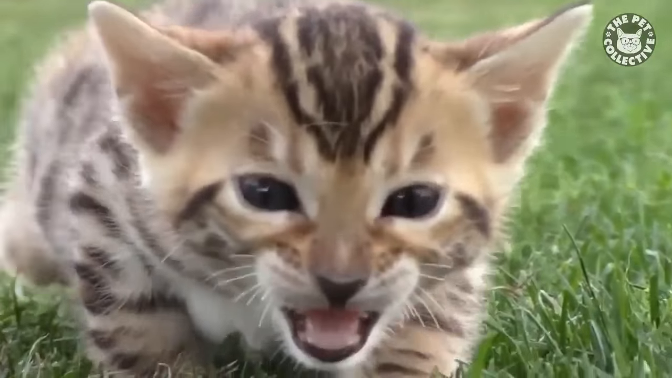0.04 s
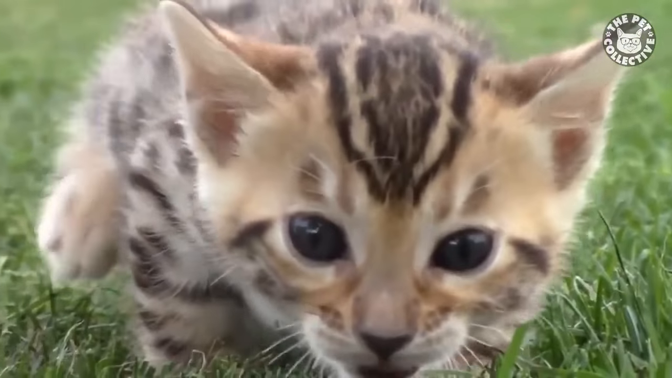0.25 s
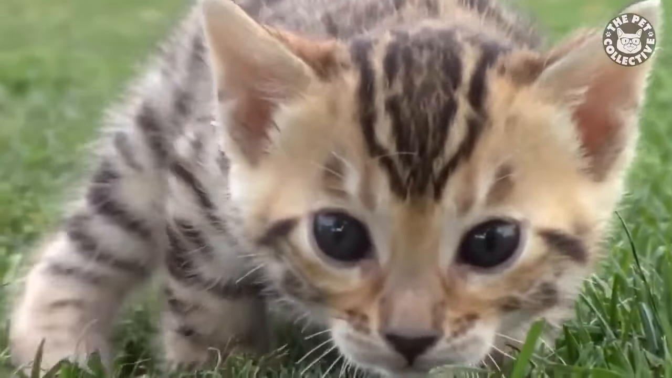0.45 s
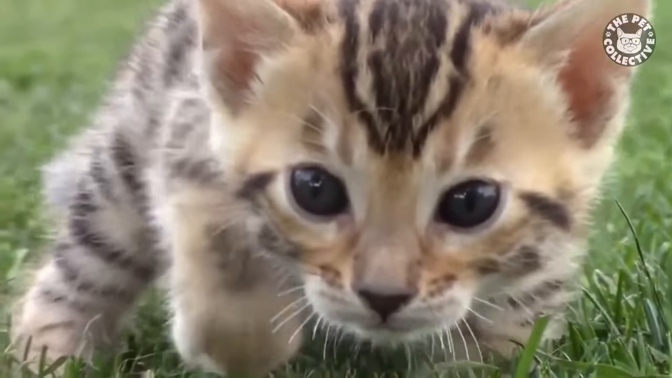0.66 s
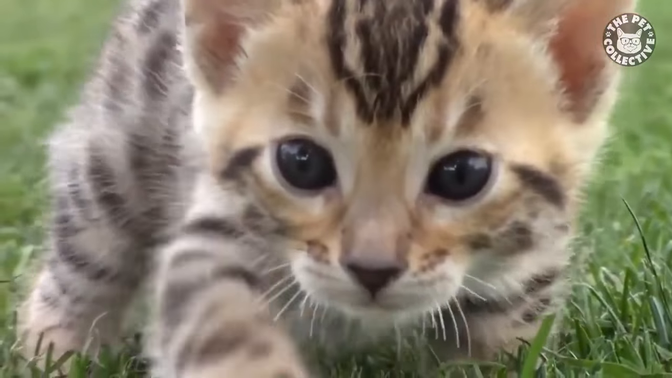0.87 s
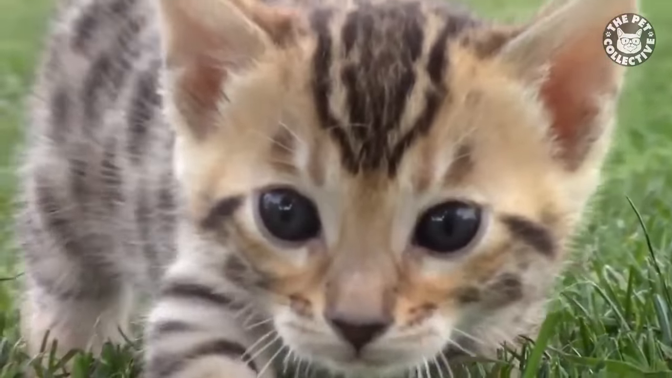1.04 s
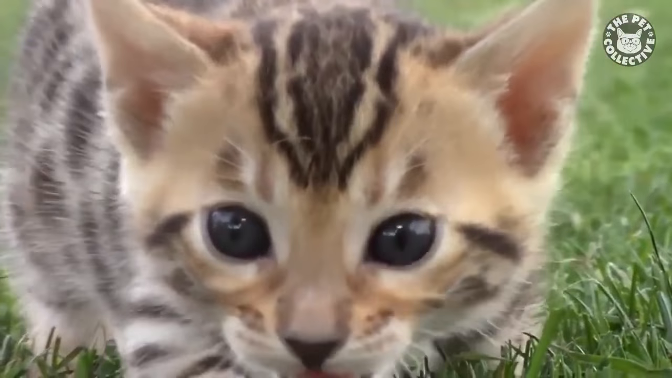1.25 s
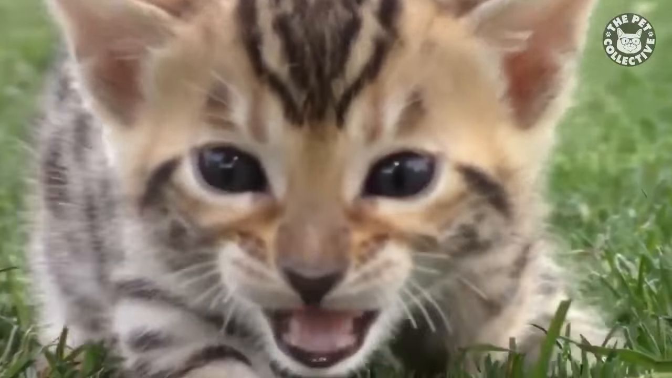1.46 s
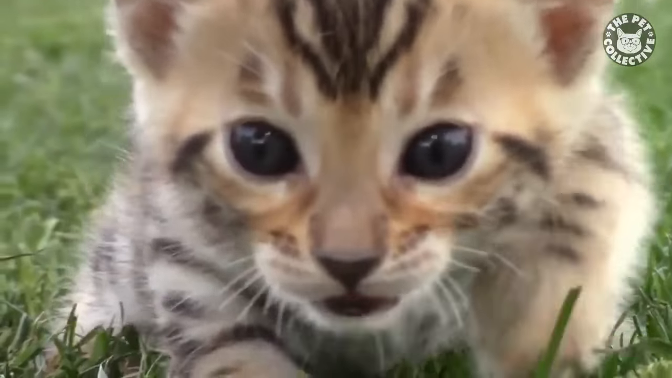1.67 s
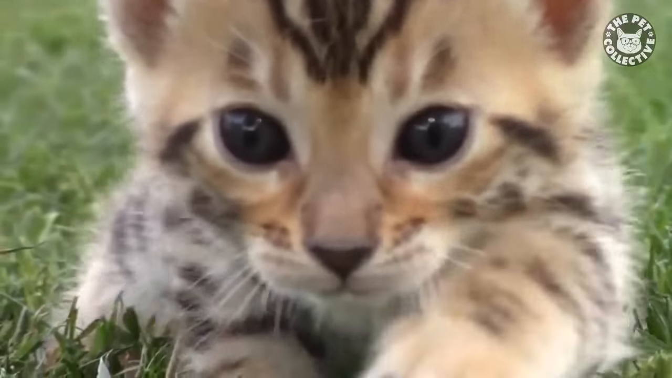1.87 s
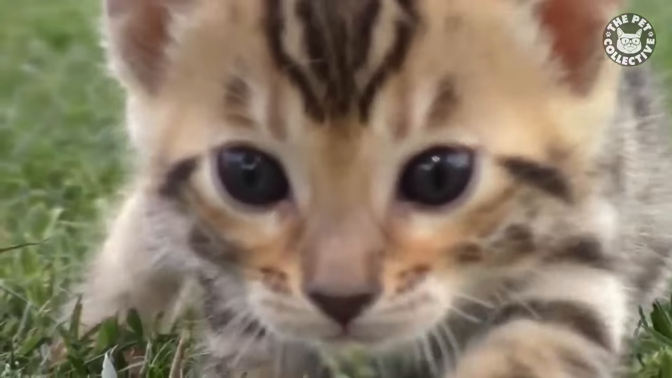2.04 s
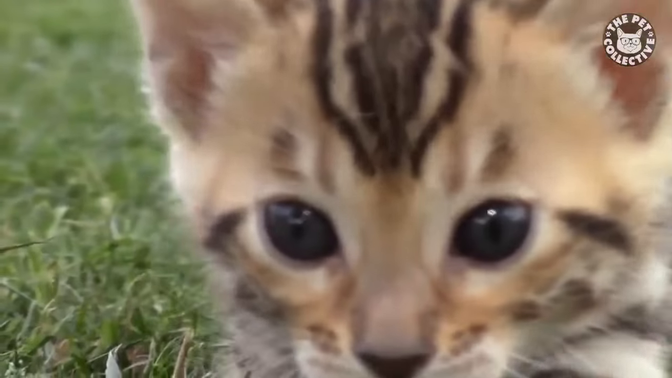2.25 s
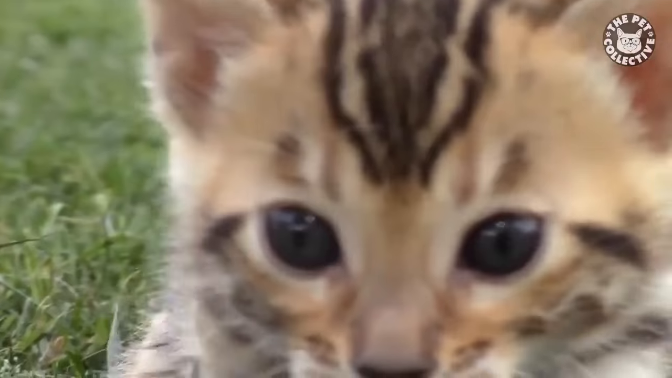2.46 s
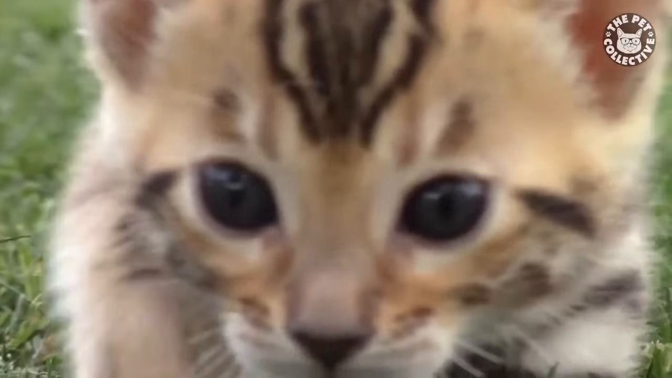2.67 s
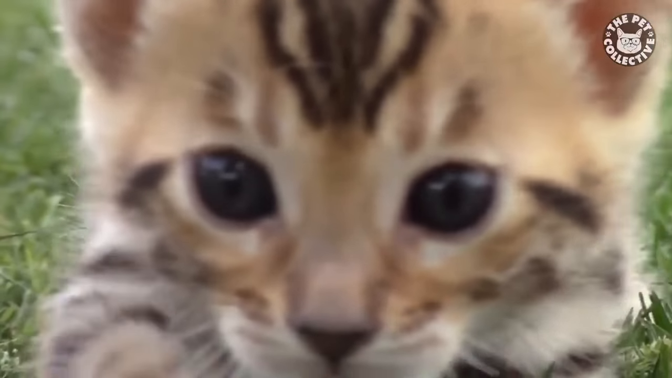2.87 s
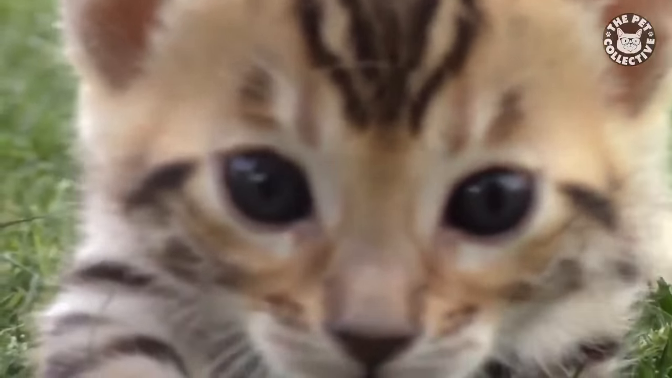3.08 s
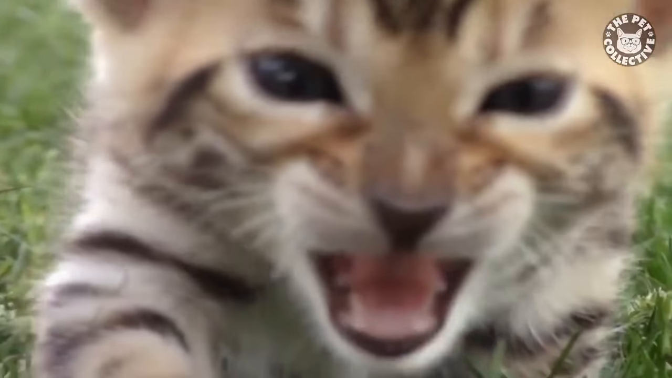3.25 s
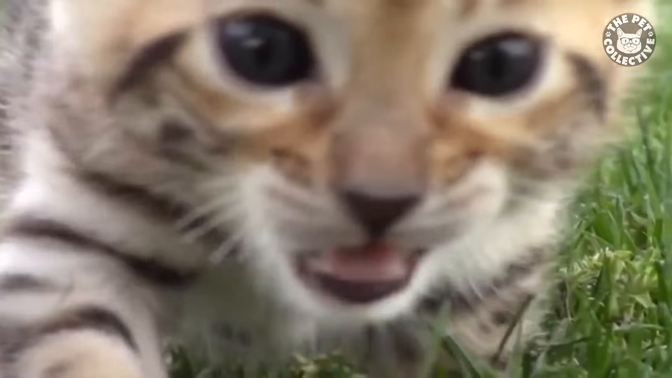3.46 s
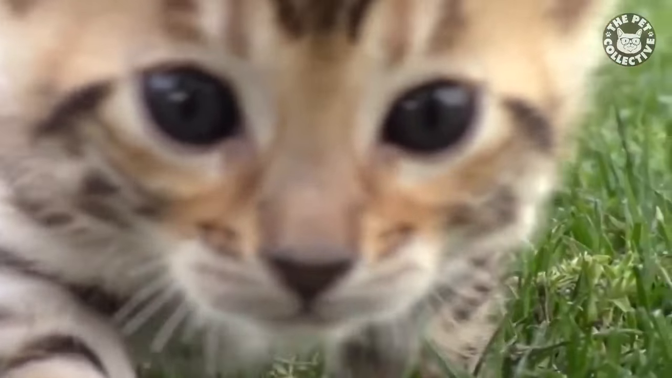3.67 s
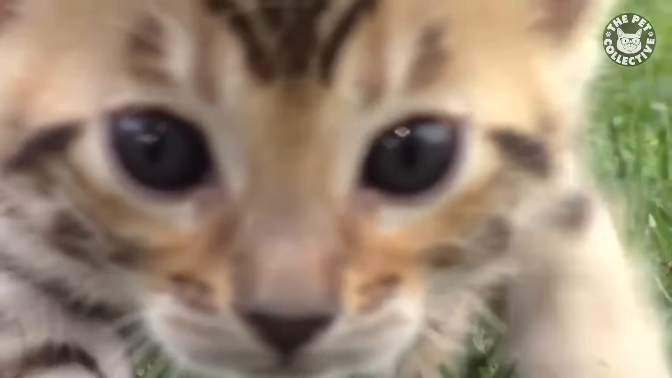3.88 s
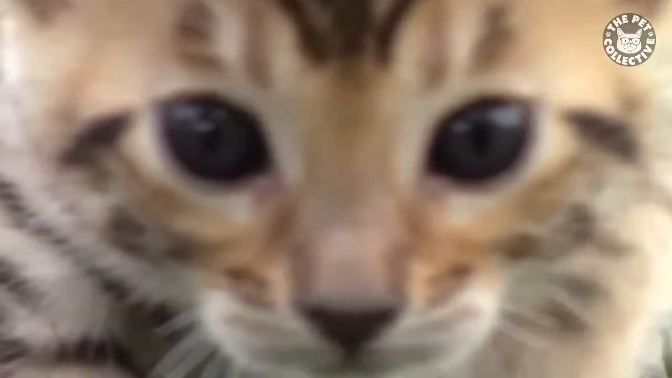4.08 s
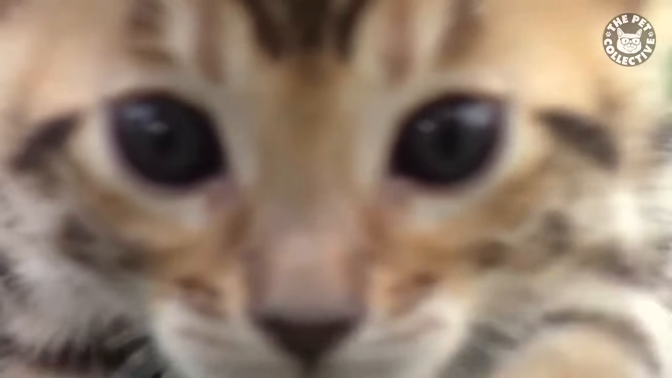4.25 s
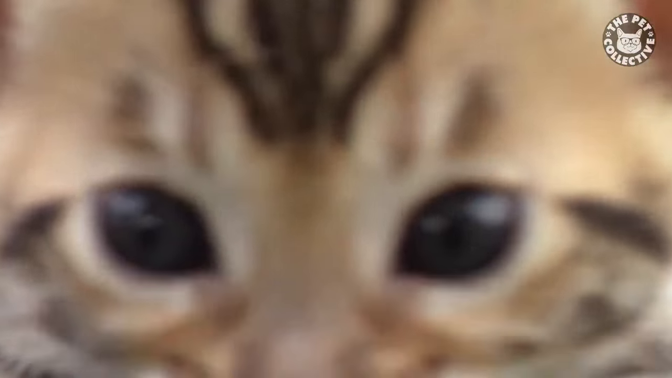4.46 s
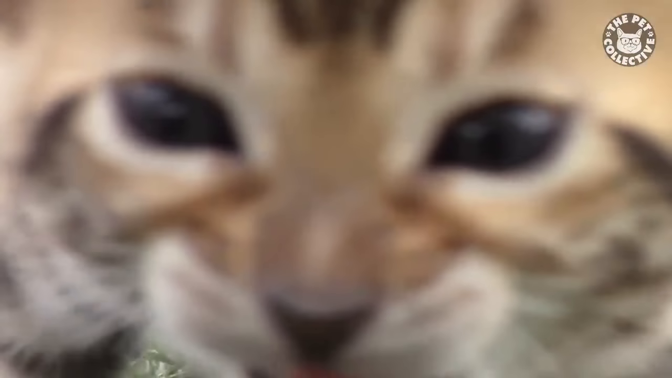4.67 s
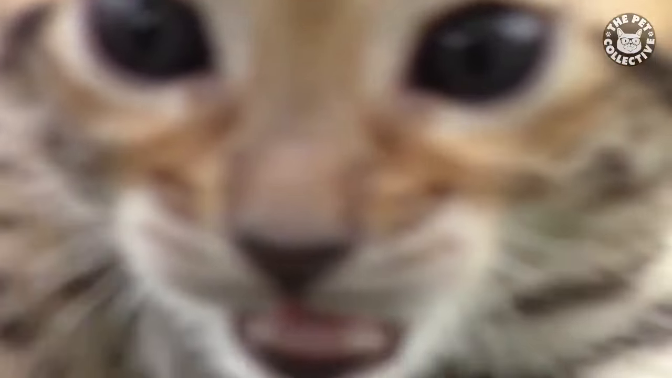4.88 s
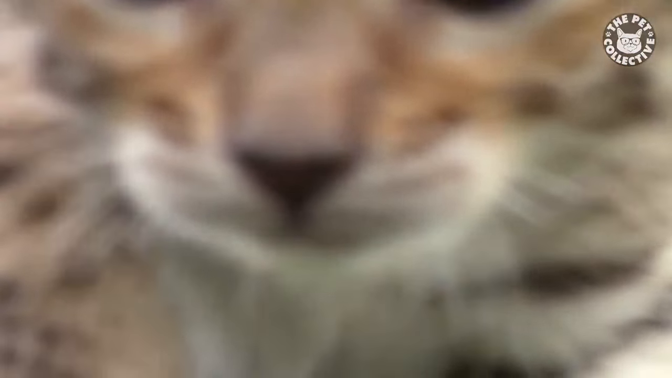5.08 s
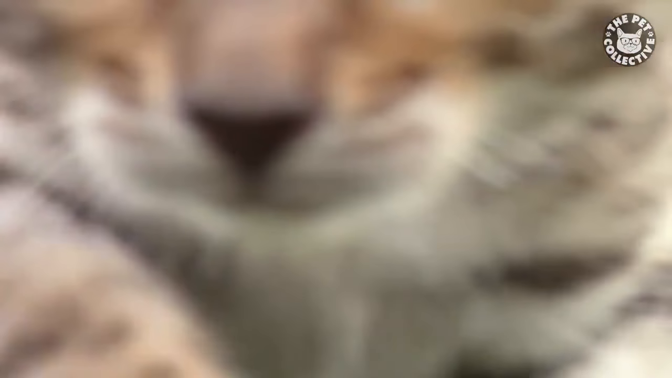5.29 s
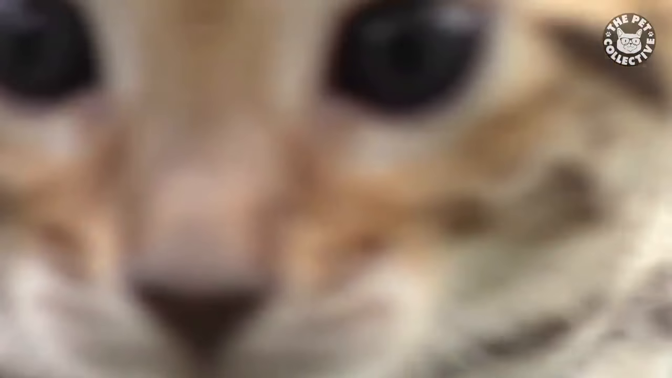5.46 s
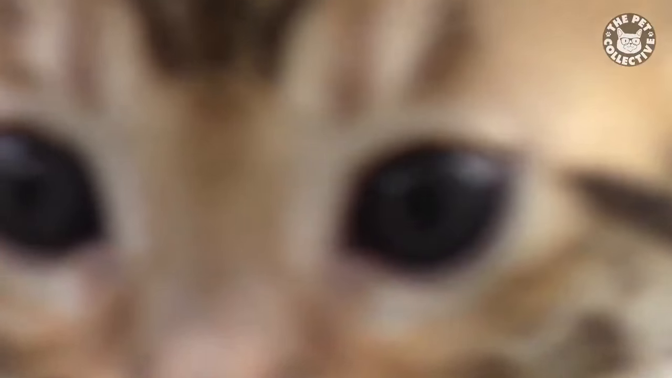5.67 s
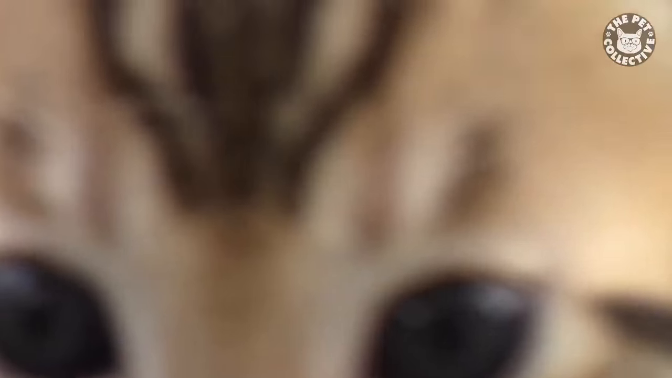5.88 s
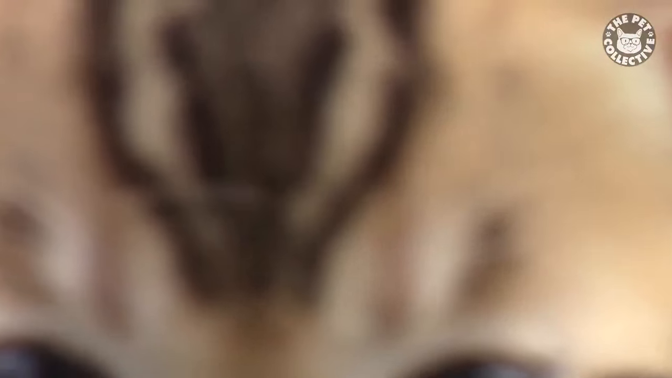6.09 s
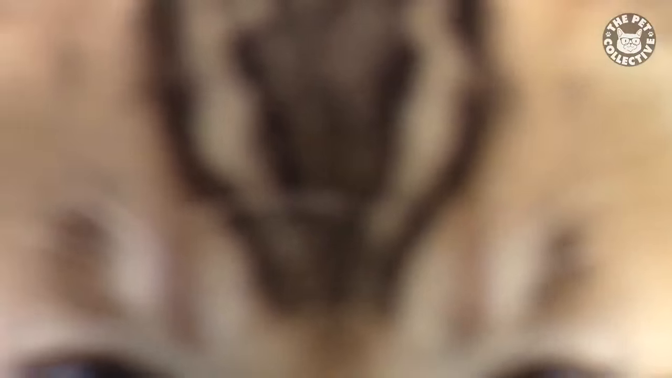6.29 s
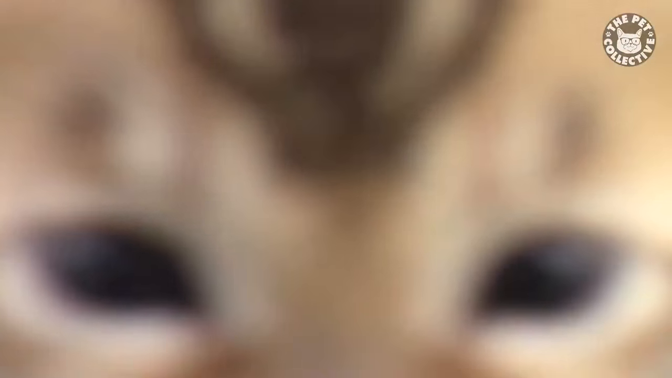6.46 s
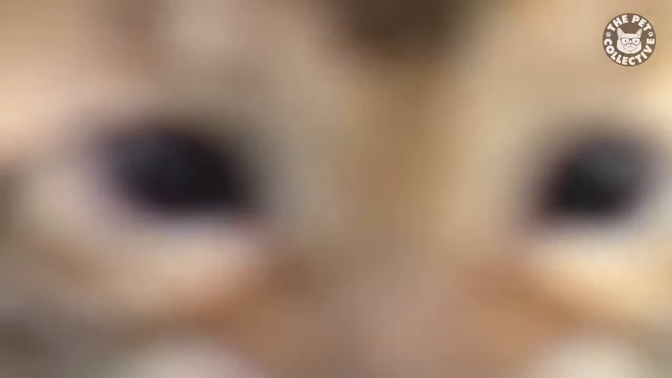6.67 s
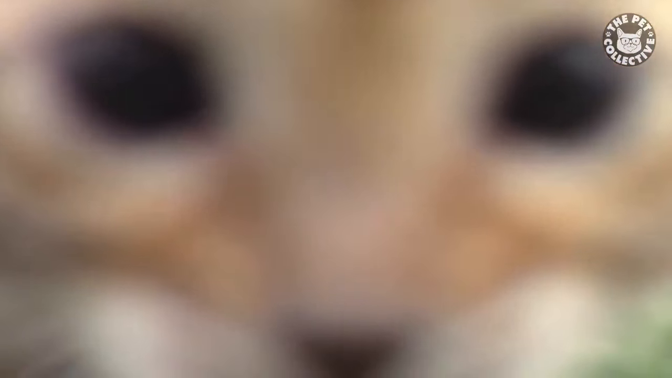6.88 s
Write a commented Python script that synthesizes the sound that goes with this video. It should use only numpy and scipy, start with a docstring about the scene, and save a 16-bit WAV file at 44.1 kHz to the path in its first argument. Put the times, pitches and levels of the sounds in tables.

```python
"""A kitten on a lawn, close to the microphone, meows five times and squeaks once; the first meow is under way at once.
Source and filter: vocal-fold harmonics and pulsed turbulence excite one moving mouth resonance. Each meow starts
raspy and wide open; the closing jaw sweeps the resonance down over the second harmonic, then the fundamental,
and the pitch breaks downward. Small noise bursts tick nearby. Gliding sine tones make the far birds and a motor;
shaped noise makes the rumble and soft hiss."""
import sys
import numpy as np
from scipy import signal
from scipy.fft import rfft, irfft
from scipy.io import wavfile
from scipy.ndimage import uniform_filter1d, minimum_filter1d

SR = 44100
rng = np.random.default_rng(int(sys.argv[2]) if len(sys.argv) > 2 else 0)


def wav_out(sig):
    """Save sig, one row per channel (or a flat mono array), as 16-bit PCM at SR to the path in sys.argv[1]."""
    wavfile.write(sys.argv[1], SR, np.round(np.clip(np.atleast_2d(sig).T, -1, 1) * 32767).astype(np.int16))


N = 305613
TIME = np.arange(N) / SR
CUTOFF_HZ = 15700
# Landmarks of a meow: start, crack (the mouth resonance crosses the second harmonic),
# crest (it comes down to the fundamental), break (the pitch gives way) and end.
ATTACK_S, HALF_SHUT_S = .02, .056  # after the start; after the crack
TUG_TURN_S = .0027  # time scale of the pitch reversal at the crack
BREAK_HZ, JUMP_S = 1270, .008  # pitch at the break, length of the sudden drop
SHUT_HZ = 1010  # resonance towards which the closing mouth settles


def meow(row, bands_hz, fade_s=.006, rasp_gain_db=2.0, puff=.78):
    """Source-filter principle: harmonic voice and pulsed turbulence share one moving mouth resonance."""
    # a second vibration of the folds beats against the pitch, swelling and fading around a moment: centre_s,
    # length_s, rate_hz, depth_db
    flutters = [(3.55, .055, 570, -31), (3.705, .022, 400, -11), (5.18, .02, 360, -11)]
    marks, pitches, levels = row[:5], row[5:12], row[12:17]
    rasps, slopes, screech_hz = row[17:20], row[20:22], row[22]
    opened = gate([[s] for s in marks], TIME, fade_s)
    active = opened > 0
    t = TIME[active]
    pitch = pitch_course(t, marks, *pitches)
    mouth = mouth_course(t, marks, pitch, screech_hz)
    level_db = level_course(t, marks, pitch, *levels)
    slope = slope_course(t, marks, *slopes)
    noise_db = rasp_course(t, marks, *rasps)

    # the folds are unsteady when the call is breathy or the pitch is slack
    breathiness = from_db(noise_db - level_db)
    slackness = np.clip(1 - pitch / 1200, 0, 1)
    rough = np.clip(breathiness + .8 * slackness, 0, .35)

    voice = from_db(level_db) * voiced(pitch, mouth, slope, rough, bands_hz)
    for s, length, rate_hz, depth_db in flutters:
        window = np.exp(-(2 * (t - s) / length) ** 2)
        voice = voice * (1 + from_db(depth_db) * window * np.sin(2 * np.pi * rate_hz * t))

    # the air escapes in puffs, one per cycle of the folds
    puffs = 1 + puff * np.cos(phase_of(pitch))
    air = rms_one(rng.standard_normal(len(t)) * puffs)
    turbulence = from_db(noise_db + rasp_gain_db) * rasp(air, mouth, rough, bands_hz)
    out = np.zeros(N)
    out[active] = voice + turbulence
    return out * opened


def pitch_course(t, marks, held_hz, overshoot_hz, crest_hz, bow, jump_hz, slide_s, bottom_hz):
    """Fold tension sets the pitch: scoop, hold, lift to the crest, sag as the effort runs out, break downward."""
    start_hz, scoop_s, scoop_ease = 712.4, .07, 1.6
    overshoot_at_s, overshoot_width_s = .083, .02
    tug_hz, tug_s, crest_ease = 38.7, .011, 1.2
    last_sag_hz_per_s = 1100
    start, crack, crest, snap, _ = marks
    scoop_left = (1 - progress(t, start, start + scoop_s)) ** scoop_ease
    hz = held_hz - (held_hz - start_hz) * scoop_left
    hz = hz + overshoot_hz * bell(t, start + overshoot_at_s, overshoot_width_s)
    # the pitch is tugged down just before the crack and up just after it
    hz = hz + tug_hz * np.tanh((t - crack) / TUG_TURN_S) * np.exp(-np.abs(t - crack) / tug_s)
    lift = np.sin(np.pi / 2 * progress(t, crack, crest) ** crest_ease) ** 2
    hz = hz + (crest_hz - held_hz) * lift
    sag = progress(t, crest, snap)
    hz = hz - (crest_hz - BREAK_HZ) * sag * (1 + bow * (1 - sag))
    hz = hz - jump_hz * progress(t, snap, snap + JUMP_S)
    hz = hz - (BREAK_HZ - jump_hz - bottom_hz) * progress(t, snap, snap + slide_s)
    return hz - last_sag_hz_per_s * np.maximum(t - snap - slide_s, 0)


def mouth_course(t, marks, pitch, screech_hz):
    """Jaw opening tunes the mouth: its resonance peaks in the scoop, sinks past two harmonics, then settles."""
    open_hz, screech_at_s, screech_width_s = 3292, .054, .026
    jaw_lead_s, jaw_ease, jaw_settle_s = .055, 1.4, .089
    start, crack, crest, _, _ = marks
    at_crack = 2 * np.interp(crack - TUG_TURN_S, t, pitch)
    at_crest = 1.08 * np.interp(crest, t, pitch)  # just above the fundamental
    hz = open_hz + (screech_hz - open_hz) * bell(t, start + screech_at_s, screech_width_s)
    hz = hz + (at_crack - open_hz) * progress(t, crack - jaw_lead_s, crack)
    hz = hz + (at_crest - at_crack) * progress(t, crack, crest) ** jaw_ease
    settled = 1 - np.exp(-np.maximum(t - crest, 0) / jaw_settle_s)
    return hz + (SHUT_HZ - at_crest) * settled


def level_course(t, marks, pitch, onset_db, crack_db, crest_db, break_db, end_db):
    """Resonant reinforcement: swells at crack, crest and break ride on one arch of effort in dB."""
    start_db = -38.5
    crest_swell_db, crest_lag_s, crest_width_s = 3.5, .017, .026
    break_swell_db, break_width_hz = 7, 180
    start, crack, crest, snap, end = marks
    effort = np.interp(t, [start, start + ATTACK_S, crest, snap, end],
                       [start_db, onset_db, crest_db, break_db, end_db])
    crack_swell = crack_db * lock(t, crack)
    crest_swell = crest_swell_db * bell(t, crest + crest_lag_s, crest_width_s)
    break_swell = break_swell_db * progress(t, snap, snap + JUMP_S) * hump(pitch, SHUT_HZ, break_width_hz)
    return effort + crack_swell + crest_swell + break_swell


def slope_course(t, marks, open_db, shut_db):
    """Spectral tilt in dB per octave: sharper fold closure as the call clears makes brighter overtones."""
    crack_slope, dull_slope, slack_slope = 4, -3.5, -13  # extra at the crack, loss after it, value at the end
    _, crack, crest, snap, end = marks
    slope = np.interp(t, [crack, crack + HALF_SHUT_S, crest, snap, end],
                      [open_db, open_db + dull_slope, shut_db, shut_db, slack_slope])
    return slope + crack_slope * lock(t, crack)


def rasp_course(t, marks, onset_db, half_shut_db, shut_db):
    """Course of the turbulence in dB, before a common gain: it changes with the mouth and is faint by the end."""
    start_db, end_db, fade_s = -57, -62, .035
    start, crack, crest, _, end = marks
    return np.interp(t, [start, start + ATTACK_S, crack + HALF_SHUT_S, crest + fade_s, end],
                     [start_db, onset_db, half_shut_db, shut_db, end_db])


def lock(t, crack):
    """Coupling of second harmonic and mouth resonance: builds up, then lets go at the crack."""
    build_s, drop_s = .039, .0066
    return np.where(t < crack, np.exp(-np.abs(t - crack) / build_s), bell(t, crack, drop_s))


def voiced(pitch, mouth, slope, rough, bands_hz, shimmer=.33, count=16):
    """Additive harmonics filtered by throat and mouth; rough folds wobble a near unit-power tone."""
    # fixed colour of the throat: frequency_hz, gain_db
    throat = [(700, 3.3), (1500, 1.8), (3000, 2), (3700, -6), (4500, 8), (6300, 5), (7500, 8), (9000, 2),
              (11000, -3), (12500, 2), (15000, 6)]
    mouth_q, upper_width_hz = 12, 500
    size = len(pitch)
    pitch = pitch * (1 + (.0022 + .028 * rough) * drift(60, size))
    k = np.arange(1, count + 1)[:, None]
    hz = k * pitch
    gain = from_db(slope * np.log2(k)) * at_hz(throat, hz) * bounce(hz, bands_hz) * (hz < CUTOFF_HZ)
    gain = gain * resonance(hz, mouth, mouth / mouth_q)
    gain = gain * resonance(hz, upper_of(mouth), upper_width_hz)

    # strained folds slap shut: a hard edge on the voice, heard while the mouth is wide open
    strain = np.minimum(rough / .15, 1)
    wide_open = np.clip(mouth / 1000 - 2.4, 0, 1)
    gain = gain * from_db(13 * strain * wide_open * hump(hz, 7000, 1700))

    # the overtones above the second harmonic swell, fade and flicker
    flicker_db = np.array([3 * drift(20, size) + .8 * drift(200, size) for _ in k])
    gain = gain * from_db((k > 2) * flicker_db)
    wave = (gain * np.sin(k * phase_of(pitch))).sum(axis=0)
    wave = wave / np.sqrt((gain ** 2).sum(axis=0) / 2)
    return wave * (1 + shimmer * rough * drift(350, size))


def rasp(air, mouth, rough, bands_hz, rough_rush=2.9, steady_rush=.089, sag=.94, width_hz=150,
         upper_db=-12, upper_width_hz=450, narrow_hz=2300, size=256):
    """Turbulence rings both mouth resonances, a little flat; rough folds let a broad rush out too."""
    # air rushing through the open mouth: frequency_hz, gain_db before the leak factor
    rush = [(700, -27.5), (1800, -21), (3000, -14.5), (4300, -14), (6200, -9.5), (7500, -12.5), (9200, -14),
            (11000, -22.5), (12500, -30.5), (15500, -36.5)]
    hz, t, frames = signal.stft(air, SR, nperseg=size)
    hz = hz[:, None]
    samples = np.arange(len(mouth))
    centre = np.interp(t * SR, samples, sag * mouth)
    leak = np.interp(t * SR, samples, rough)
    # the upper resonance hisses most while the mouth is half shut
    hiss = from_db(upper_db) * hump(centre, narrow_hz, 740)
    gain = hump(hz, centre, width_hz) + hiss * hump(hz, upper_of(centre), upper_width_hz)
    gain = gain + (rough_rush * leak + steady_rush) * at_hz(rush, hz) * bounce(hz, bands_hz)
    unit_gain = gain / np.sqrt(np.mean(gain ** 2, axis=0))
    return signal.istft(frames * unit_gain, SR)[1][:len(mouth)]


def upper_of(mouth):
    """Coupled cavities: the upper resonance sinks with the lower one."""
    # resonances for each mouth opening: mouth_hz, upper_hz
    pairs = [(1000, 7800), (1500, 8900), (2200, 10200), (3000, 11200)]
    return np.interp(mouth, *np.transpose(pairs))


def bounce(hz, bands_hz):
    """Interference: sound bounced off the ground lifts one treble band and cancels another."""
    lifted, cancelled = bands_hz
    return from_db(4 * hump(hz, lifted, 400) - 12 * hump(hz, cancelled, 450))


def squeak(jitter=.008):
    """Additive synthesis: a short, low mew with the mouth nearly shut has only a few harmonics."""
    # strength of each harmonic: multiple, level_db (relative)
    partials = [(1, 3), (2, 1.5), (3, -4), (4, -6.5), (5, -19)]
    # course of the squeak: time_s, pitch_hz, level_db
    course = [(2.952, 488, -63.5), (2.961, 526, -42.5), (2.968, 569, -42), (3.015, 588, -38),
              (3.023, 562, -45)]
    hz, db = in_time(course, TIME)
    phase = phase_of(hz * (1 + jitter * drift(148.4, N)))
    wave = rms_one(sum(from_db(partial_db) * np.sin(k * phase) for k, partial_db in partials))
    return from_db(db) * gate(course, TIME, .004) * wave


def ticks(decay_s=.0012, spread=1.05):
    """Impulsive excitation: brief decaying noise bursts, each band-passed around its own centre."""
    # small ticks of lips and grass: start_s, peak_db, centre_hz
    tick_rows = [(.892, -40.5, 1380), (1.402, -31, 4100), (3.019, -41, 1506), (3.231, -42.5, 3260),
                 (3.758, -52, 2800), (4.586, -40.5, 3990), (5.214, -45, 2500), (6.507, -34.5, 3000)]
    out, t = np.zeros(N), np.arange(SR // 40) / SR
    for s, db, hz in tick_rows:
        band = signal.butter(2, [hz / spread, hz * spread], "band", fs=SR, output="sos")
        burst = signal.sosfilt(band, rng.standard_normal(len(t)) * np.exp(-t / decay_s))
        first = int(s * SR)
        out[first:first + len(t)] += from_db(db) * burst / np.abs(burst).max()
    return out


def birds(unsteady=.0051):
    """Frequency and amplitude modulation: thin gliding whistles and one pulsed trill."""
    # bird notes: start_s, length_s, start_hz, end_hz, level_db
    chirps = [(1.195, .03, 5200, 3850, -55), (1.24, .025, 5200, 3930, -63), (1.259, .03, 5100, 3900, -55.5),
              (1.29, .06, 8400, 7300, -60), (1.328, 0.032, 4200, 3626, -57.5),
              (1.706, .06, 8400, 7600, -58), (1.892, 0.054, 8500, 7140, -48),
              (2.345, 0.045, 3400, 4090, -53), (2.374, .03, 4000, 3300, -58), (2.4, .6, 7330, 7360, -67.5),
              (2.984, .05, 8100, 7700, -60), (3.027, 0.056, 7900, 7470, -64),
              (3.086, 0.05, 4450, 4140, -53.5), (5.157, 0.039, 3500, 4070, -49.5),
              (5.182, .025, 4100, 3330, -56)]
    # course of the trill: time_s, pitch_hz, level_db
    trill = [(1.96, 6600, -54), (2.15, 6370, -52), (2.3, 6280, -57), (2.41, 6370, -65)]
    trill_rate_hz = 15.8
    out = np.zeros(N)
    for s, length, start_hz, end_hz, db in chirps:
        now = (TIME > s) & (TIME < s + length)
        u = (TIME[now] - s) / length
        hz = (start_hz + (end_hz - start_hz) * u) * (1 + unsteady * drift(150, len(u)))
        out[now] += from_db(db) * np.sqrt(2) * np.sin(np.pi * u) * np.sin(phase_of(hz))
    hz, db = in_time(trill, TIME)
    pulses = np.sin(np.pi * trill_rate_hz * (TIME - trill[0][0])) ** 4
    notes = pulses * gate(trill, TIME, .005)
    whistle = np.sin(phase_of(hz * (1 + unsteady * drift(188, N))))
    return out + from_db(db) * np.sqrt(2) * notes * whistle


def background(ambience_db=-49.5, swell_db=-.5, motor_waver=.024):
    """Filtered noise gives distant rumble and soft hiss; a wavering sine is a motor droning past."""
    # outdoor spectrum, later scaled to unit power: frequency_hz, density_db (relative, per hertz)
    spectrum = [(15, -63), (25, -36.5), (37, -19), (126, -4.5), (193, -3.5), (281, -6), (368, -5),
                (456, -6.5), (536, -7), (1410, -21.5), (5140, -26), (6370, -31.5), (7290, -31), (9280, -38),
                (15500, -53.5)]
    # a far motor: time_s, pitch_hz, level_db
    motor = [(3.6, 411, -70), (3.88, 383, -52), (4.1, 359, -49.5), (4.35, 366, -56), (4.7, 355.3, -66.5)]
    white = rfft(rng.standard_normal(N))
    noise = rms_one(irfft(white * at_hz(spectrum, np.fft.rfftfreq(N, 1 / SR)), N))
    air = noise * from_db(ambience_db + swell_db * drift(1.4, N))
    hz, db = in_time(motor, TIME)
    drone = np.sqrt(2) * np.sin(phase_of(hz * (1 + motor_waver * drift(24.52, N))))
    return air + from_db(db) * gate(motor, TIME, .1) * drone


def garden(x):
    """Diffuse reflection: a short decaying scatter from ground, hedges and walls."""
    t = np.arange(SR // 2) / SR
    decay = from_db(-60 * t / .25)  # 60 dB in a quarter second
    echoes = rng.standard_normal(len(t)) * decay * (t > .012)
    return signal.fftconvolve(x, echoes / np.linalg.norm(echoes))[:N]


def resonance(hz, centre, width):
    """Second-order resonance: gain 1 far below, a peak at the centre, falling above."""
    return 1 / np.hypot(1 - (hz / centre) ** 2, hz * width / centre ** 2)


def hump(hz, centre, width):
    """Lorentzian resonance curve of height 1."""
    return 1 / (1 + ((hz - centre) / width) ** 2)


def bell(t, centre, width):
    """Gaussian bump of height 1."""
    return np.exp(-((t - centre) / width) ** 2)


def progress(t, begin, end):
    """Linear ramp from 0 to 1 between two moments."""
    return np.clip((t - begin) / (end - begin), 0, 1)


def gate(rows, t, fade):
    """Linear envelope: one while a curve lasts, fading just outside its ends."""
    return np.clip(1 + np.minimum(t - rows[0][0], rows[-1][0] - t) / fade, 0, 1)


def drift(rate_hz, size):
    """Low-pass filtered noise: smooth random wander of unit power."""
    r = np.exp(-2 * np.pi * rate_hz / SR)
    wander = signal.lfilter([1], [1, -2 * r, r * r], rng.standard_normal(size + SR))
    return rms_one(wander[SR:])  # the first second lets the filter settle


def phase_of(hz):
    """Phase in radians is the running integral of frequency."""
    return 2 * np.pi * np.cumsum(hz) / SR


def in_time(rows, t):
    """Linear interpolation of each column of a curve at the times t."""
    s, *columns = np.transpose(rows)
    return [np.interp(t, s, c) for c in columns]


def at_hz(points, hz):
    """Spectral gain, interpolated in dB over log frequency."""
    f, db = np.transpose(points)
    return from_db(np.interp(np.log(hz + 1), np.log(f), db))


def from_db(db):
    """Logarithmic level in decibels to amplitude gain."""
    return 10 ** (np.asarray(db) / 20)


def rms_one(x):
    """Normalization to unit mean power."""
    return x / np.sqrt(np.mean(x ** 2) + 1e-20)


def scene(kitten_echo_db=-40, bird_echo_db=-9):
    """Direct-to-reverberant ratio gives distance: the kitten is nearly dry, the far birds are washed."""
    # one meow a row: start_s, crack_s, crest_s, break_s, end_s,
    # held_hz, overshoot_hz, crest_hz, sag_bow (0-1), jump_hz, slide_s, bottom_hz,
    # effort before swells and the crack swell: onset_db, crack_swell_db, crest_db, break_db, end_db,
    # turbulence before its common gain: onset_rasp_db, half_shut_rasp_db, shut_rasp_db,
    # open_slope_db_per_octave, shut_slope_db_per_octave, screech_hz (mouth resonance in the scoop)
    meow_rows = [(-.055, 0.078, .187, .383, .465, 1505, 22, 1558, 0.7, 10, .036, 770, -34, 10.5, -4.5, -21, -45.5, -43.5, -45.5, -55.5, -15, -9, 3453),
                 (1.366, 1.514, 1.609, 1.814, 1.884, 1464, 13, 1513, 0.5, 10, .046, 825, -31, 14.5, -1.5, -26.5, -37.5, -47, -35, -59.5, -11.5, -8.5, 3483),
                 (3.233, 3.365, 3.462, 3.651, 3.735, 1547, 26.4, 1641, 0.2, 160, .035, 790, -27, 10, -2, -18.5, -44, -37, -37, -48.5, -13, -6, 3353),
                 (4.595, 4.73, 4.848, 5.083, 5.209, 1493, 55, 1596, 0.3, 130, 0.083, 730, -23.5, 10, -1.5, -17.5, -34, -31, -37, -52.5, -11, -6.5, 3585),
                 (6.516, 6.651, 6.767, 7.02, 7.12, 1517, 166, 1621, 0.31, 150, .06, 740, -21.5, 9, -1, -18, -37.5, -25, -35, -49.5, -10, -5, 4080)]
    # the ground bounce shifts from meow to meow as the kitten walks up: lifted_hz, cancelled_hz
    bounce_bands = [(4500, 5900), (4450, 5850), (4750, 5700), (7700, 5200), (6450, 4900)]
    meows = sum(meow(row, bands_hz) for row, bands_hz in zip(meow_rows, bounce_bands))
    kitten = meows + squeak() + ticks()
    song = birds()
    echo = garden(from_db(kitten_echo_db) * kitten + from_db(bird_echo_db) * song)
    return (kitten + song + echo + background())[None]


def record(dry, release_db_per_s=60, size=128):
    """Dynamic compression: a look-ahead limiter flattens the loudest swells; a low-pass cuts the top steeply."""
    over_db = np.maximum(20 * np.log10(np.abs(dry) / .86 + 1e-9), 0)
    release_db = release_db_per_s * TIME
    held_db = np.maximum.accumulate(over_db + release_db, axis=-1) - release_db
    gain = uniform_filter1d(minimum_filter1d(from_db(-held_db), size), size)
    top_cut = signal.ellip(12, .1, 90, CUTOFF_HZ, fs=SR, output="sos")
    return signal.sosfilt(top_cut, dry * gain)


dry = scene()
out = record(dry)
wav_out(out)
```